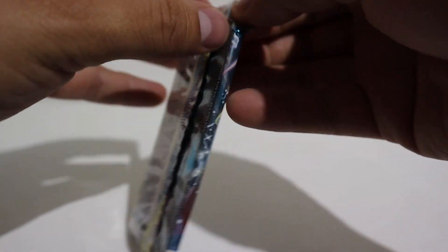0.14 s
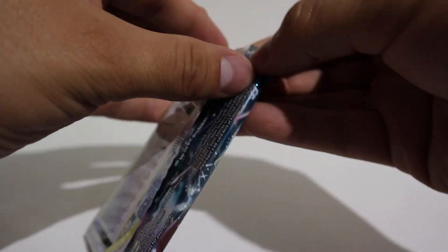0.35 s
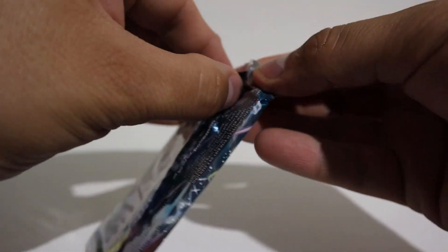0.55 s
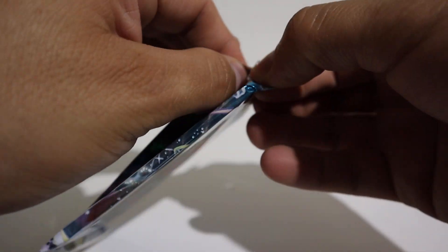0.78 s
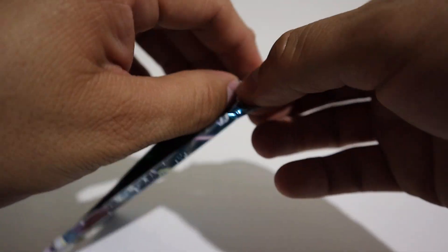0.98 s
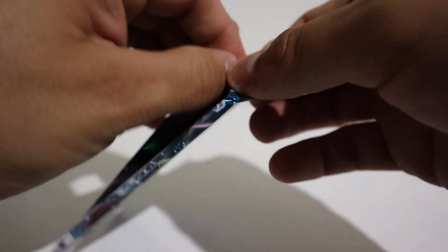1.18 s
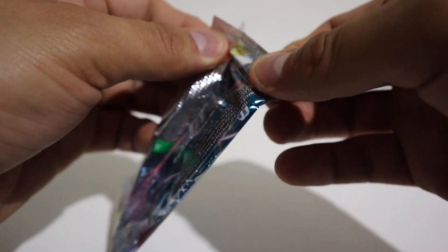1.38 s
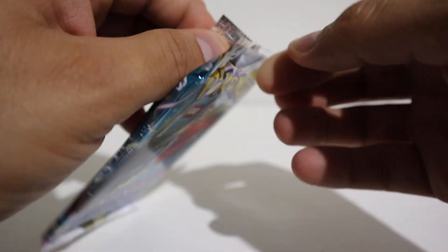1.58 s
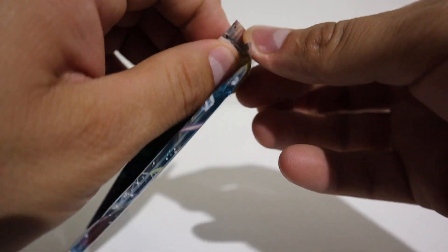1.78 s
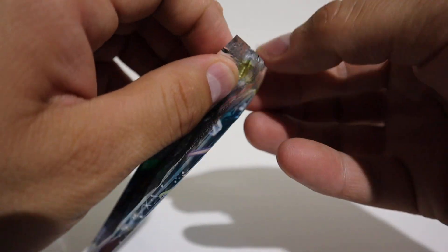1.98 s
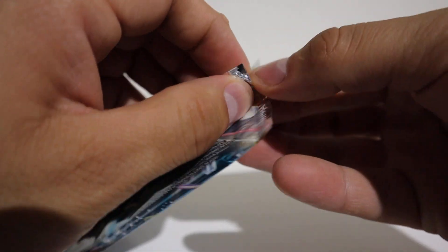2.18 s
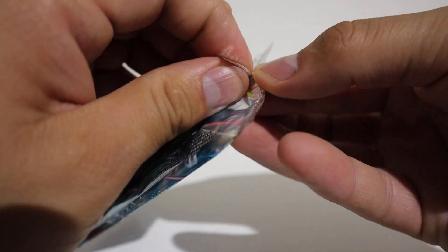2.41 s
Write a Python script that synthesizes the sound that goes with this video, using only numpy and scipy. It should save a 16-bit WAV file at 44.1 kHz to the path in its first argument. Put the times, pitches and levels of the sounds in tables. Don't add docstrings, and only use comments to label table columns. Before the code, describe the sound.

A foil wrapper crinkles and tears in sharp crackling snaps, close up in a quiet room

```python
import sys
import numpy as np
from scipy import signal
from scipy.fft import rfft, irfft
from scipy.io import wavfile

SR = 44100
rng = np.random.default_rng(int(sys.argv[2]) if len(sys.argv) > 2 else 0)


def wav_record(signal):
    frames = np.transpose(np.atleast_2d(signal))
    bounded = np.clip(frames, -1, 1)
    quanta = np.round(bounded * 32767).astype(np.int16)
    wavfile.write(sys.argv[1], SR, quanta)


N = 108045

# (frequency [Hz], level [dB])
FOIL_COLOUR = [(2200, -11), (3800, -7), (5000, -8), (6500, -6.5), (8000, -7.5), (10500, -4), (13000, -10)]
# (frequency [Hz], level [dB])
PACK_COLOUR = [(400, -18), (1250, -1.5), (1700, 0.5), (2100, 1.5), (2600, -1.5)]
# (frequency [Hz], likeness [0-1])
PORT_LIKENESS = [(40, 1), (125, 0.86), (300, 0.16), (5000, 0.033)]
BRIGHT_ALIKE, DULL_ALIKE = 0.95, 0.56
PORT_LAG_S = 0.00003
LEAD = 130


def from_db(db):
    return 10 ** (np.asarray(db) / 20)


def rms_one(x):
    return x / np.sqrt(np.mean(x ** 2) + 1e-20)


def at_hz(points, hz):
    table_hz, value = np.transpose(points)
    return np.interp(np.log(hz + 1), np.log(table_hz), value)


def colour(x, points, edge_db=14):
    hz = np.arange(513) * SR / 1024 + 1
    octaves_below = np.maximum(np.log2(points[0][0] / hz), 0)
    octaves_above = np.maximum(np.log2(hz / points[-1][0]), 0)
    level_db = at_hz(points, hz) - edge_db * (octaves_below + octaves_above)
    cepstrum = irfft(np.log(from_db(level_db)))
    cepstrum[1:512] *= 2
    cepstrum[513:] = 0
    response = irfft(np.exp(rfft(cepstrum)))[None, :600]
    return signal.fftconvolve(x, response, axes=1)[:, :x.shape[1]]


def resonate(x, hz, width_hz):
    r = np.exp(-np.pi * width_hz / SR)
    zeros = [(1 - r * r) / 2, 0, (r * r - 1) / 2]
    poles = [1, -2 * r * np.cos(2 * np.pi * hz / SR), r * r]
    return signal.lfilter(zeros, poles, x)


def pair(shared, own, alike):
    alike = np.clip(alike, 0, 1)
    return np.sqrt(alike) * shared + np.sqrt(1 - alike) * own


def to_ports(x, lag_s, pan_db):
    n = x.shape[1]
    cycles = np.arange(n // 2 + 1) / n
    turn = np.exp(-2j * np.pi * cycles * lag_s * SR)
    left = x[0] * from_db(pan_db / 2)
    right = irfft(rfft(x[1]) * turn, n) * from_db(-pan_db / 2)
    return np.array([left, right])


def add(out, x, s):
    i = int(s * SR) - LEAD
    out[:, i:i + x.shape[1]] += x[:, :N - i]


def hum():
    # (frequency [Hz], level [dB per Hz])
    air_colour = [(34, -7.5), (46, -5), (160, -5), (400, -10), (6000, -22), (12000, -23.5)]
    # (time [s], level [dB])
    gain_ride = [(0, 3), (1.35, 1.5), (1.38, 0.5), (1.7, -0.5), (2.45, -1)]
    fan_hz, overtone_hz, fan_spread_hz = 202, 307, 22
    hz = np.arange(N // 2 + 1) * SR / N
    mid, side = rfft(rng.standard_normal((2, N))) * from_db(at_hz(air_colour, hz))
    alike = np.clip(at_hz(PORT_LIKENESS, hz), 0, 1)
    left_right = np.array([[1], [-1]])
    air = irfft(np.sqrt(1 + alike) * mid + np.sqrt(1 - alike) * side * left_right, N)

    def wavering_tone(tone_hz, width_hz):
        once = resonate(rng.standard_normal(N), tone_hz, width_hz)
        return rms_one(resonate(once, tone_hz, width_hz))

    fan = from_db(-60.5) * wavering_tone(fan_hz, fan_spread_hz)
    overtone = from_db(-64) * wavering_tone(overtone_hz, fan_spread_hz * 2)
    gain = from_db(np.interp(np.arange(N) / SR, *np.transpose(gain_ride)))
    return gain * (from_db(-49) * rms_one(air) + fan + overtone)


def grains(low_hz, high_hz, points, alike):
    grains_per_s, spread_db, cycles, pitches = 9000, 2.7, 12.0, 16
    sizes = from_db(spread_db * np.minimum(rng.exponential(1, N), 5))
    sizes = sizes * (rng.random(N) < grains_per_s / SR)
    sizes = sizes * pair(rng.standard_normal(N), rng.standard_normal((2, N)), alike)
    dealt = rng.integers(0, pitches, N)
    rings = 0
    for k, hz in enumerate(np.geomspace(low_hz, high_hz, pitches)):
        pops = sizes * (dealt == k) + 1e-18
        rings = rings + resonate(pops, hz, hz * 2 / cycles) / np.sqrt(hz)
    if low_hz > 2000:
        rings = np.diff(rings, prepend=0)
    lag_s = PORT_LAG_S * (low_hz > 3000)
    return to_ports(rms_one(colour(rings, points)), lag_s, 0)


def rustle():
    # (time [s], length [s], level [dB], dull part re level [dB])
    strokes = [(0.053, 0.028, -46.5, -10), (0.155, 0.091, -35.5, -12.5), (0.246, 0.094, -40.5, -8.5),
               (0.395, 0.042, -36.5, -5), (0.508, 0.058, -43.5, 0), (0.542, 0.041, -40.5, -1),
               (0.597, 0.14, -44.5, 3), (0.952, 0.036, -41.5, -3), (0.994, 0.058, -36, -5),
               (1.063, 0.055, -45, -0.5), (1.124, 0.071, -35.5, 0), (1.206, 0.054, -35.5, -6),
               (1.299, 0.055, -25.5, -8), (1.469, 0.05, -44.5, -14), (1.565, 0.054, -38.5, -11),
               (1.663, 0.03, -31, -8), (1.879, 0.033, -40.5, -23), (1.928, 0.0068, -37, -15),
               (2.089, 0.066, -46, 3), (2.189, 0.033, -41.5, 1.5), (2.24, 0.08, -46.5, -1),
               (2.346, 0.049, -48, -8), (2.417, 0.0096, -56, -64)]
    attack_s, release_s = 0.012, 0.009
    tilt = 0.25
    t, top, middle, dull = np.arange(N) / SR, 0, 0, 0
    for s, length, db, dull_db in strokes:
        swell = np.clip((t - s) / attack_s, 0, 1) ** 2
        shape = swell * np.exp(-np.maximum(t - s - length, 0) / release_s)
        top = top + shape * from_db(db - tilt * dull_db)
        middle = middle + shape * from_db(db)
        dull = dull + shape * from_db(db + dull_db)
    return (top * grains(4300, 11400, FOIL_COLOUR, BRIGHT_ALIKE)
            + middle * grains(2590, 4630, FOIL_COLOUR, DULL_ALIKE)
            + dull * grains(480, 2960, PACK_COLOUR, DULL_ALIKE))


def snap(bright_db, dull_db, hz, noise, chance):
    crack_s = 0.0008 * from_db(3 * np.clip(chance[0], -1.5, 1.5))
    rattle_s, rattle_db, thump_s = 0.003, -16, 0.0007
    lead_in_s, lead_in_db = 0.0008, -17
    early = (np.arange(noise.shape[1]) - LEAD) / SR
    t = np.maximum(early, 0)
    crack = (t > 0) * (np.exp(-t / crack_s) + from_db(rattle_db) * np.exp(-t / rattle_s))
    crack = crack + (early <= 0) * from_db(lead_in_db) * np.exp(np.minimum(early, 0) / lead_in_s)
    click = -from_db(15 + 2 * chance[3]) * (np.arange(len(t)) == LEAD + 4)
    thump = t / thump_s * np.exp(-t / thump_s)
    bright = colour(pair(noise[0], noise[1:3], BRIGHT_ALIKE) * crack + click, FOIL_COLOUR)
    dull = colour(pair(noise[3], noise[4:], DULL_ALIKE) * thump + 0.2 * click, PACK_COLOUR)

    if hz > 2300:
        bright = signal.lfilter(*signal.butter(1, min(1.8 * hz, 19000), fs=SR), bright)
        bright = bright + from_db(13.0) * resonate(bright, hz, hz * 0.4)
    else:
        dull = dull + 2 * resonate(dull, hz, hz / 2)

    def onset_level(x):
        return np.sqrt(np.mean(x[:, LEAD - 10:LEAD + 90] ** 2)) + 1e-9

    lag_s, pan_db = PORT_LAG_S + 0.00004 * chance[1], 2.0 * chance[2]
    bright = to_ports(bright / onset_level(bright), lag_s, pan_db)
    return from_db(bright_db) * bright + from_db(dull_db) * dull / onset_level(dull)


def snaps():
    # (time [s], bright level [dB], dull level [dB], crease pitch [Hz])
    bends = [(0.1326, -21, -33.5, 3600), (0.2062, -24, -60, 6370), (0.2141, -16.5, -30.5, 10200),
             (0.2329, -30, -38, 9260), (0.265, -40, -52, 10490), (0.2822, -26, -29, 3980),
             (0.2966, -34, -36, 6420), (0.3032, -29.5, -46.9, 4890), (0.319, -31.8, -51, 4910),
             (0.3358, -23, -26, 3640), (0.3531, -33, -28, 3080), (0.3575, -25.5, -34, 6360),
             (0.4, -28, -51, 5700), (0.4056, -12, -14, 1260), (0.446, -25.5, -33.6, 1760),
             (0.476, -33, -38.0, 1790), (0.4977, -15, -20, 1520), (0.503, -39.2, -23.5, 1770),
             (0.5187, -11.5, -27, 8500), (0.5316, -30.1, -50, 10530), (0.5689, -22, -45.2, 11150),
             (0.5736, -24, -40, 1720), (0.5745, -24.5, -43, 1960), (0.5834, -27.5, -45, 3730),
             (0.59, -28, -49, 9200), (0.6019, -32, -58, 4820), (0.6071, -30, -40, 10200),
             (0.611, -31.5, -42, 4950), (0.6151, -23.5, -27.5, 1850), (0.6369, -29, -15.5, 1720),
             (0.6551, -8.5, -33, 11200), (0.6598, -19.5, -34.5, 4030), (0.675, -43, -35, 3880),
             (0.684, -13, -20, 5830), (0.693, -26, -40, 3020), (0.7106, -29.5, -47, 3320),
             (0.7312, -17.5, -26.5, 1930), (0.7758, -23.5, -31.5, 11500),
             (0.7794, -20.5, -48.2, 3730), (0.8301, -36.5, -61, 8530), (0.8436, -40, -63, 9150),
             (0.8534, -44, -66, 9300), (0.8684, -43, -72, 9400),
             (0.9396, -26.5, -41, 3080), (0.9976, -19.5, -52, 5800), (1.008, -13, -43, 9500),
                  (1.017, -40, -49, 5860), (1.032, -19.5, -29, 5700), (1.0432, -25, -37, 4580),
                  (1.0938, -30, -56.6, 3150), (1.1017, -32, -43, 8400), (1.104, -28, -54, 3700),
                  (1.1171, -28, -34, 1960), (1.1305, -13.5, -30, 7500), (1.1327, -11, -29.5, 11000),
                  (1.1477, -20, -40, 8300), (1.1677, -3, -14, 7820), (1.2194, -15.6, -52, 10300),
                  (1.2322, -18, -24.5, 9500), (1.2352, -17, -38, 4700), (1.278, -33, -45, 7750),
                  (1.2935, -20, -41.5, 9780), (1.301, -14.5, -45.2, 10660), (1.3036, -17.0, -34, 3330),
                  (1.3137, -10, -47, 10500), (1.3171, -6.5, -44, 10000), (1.3244, -26, -27.5, 9800),
                  (1.3355, -11, -30.8, 7700), (1.3403, -12, -16, 4070), (1.352, -4.5, -19, 3820),
                  (1.3771, -11.5, -26, 7900), (1.4755, -34, -56, 4590), (1.4909, -29.5, -52, 3200),
                  (1.4983, -25, -48.4, 9500),
             (1.5079, -32, -56.8, 9910), (1.5199, -40, -42.7, 2660), (1.5904, -10, -28, 5900),
                  (1.5988, -23.4, -29.5, 5470), (1.614, -28.8, -43, 3360), (1.6401, -21.5, -25.5, 2780),
                  (1.675, -27, -30.5, 8100), (1.7001, -27, -36, 10400), (1.808, -31.8, -38.5, 11070),
                  (1.8231, -15, -24.5, 9900), (1.8303, -14, -33, 10200), (1.836, -17, -23, 4400),
                  (1.8423, -12, -23.5, 4360), (1.8928, -26.5, -61.0, 5330), (1.912, -32, -55.6, 6010),
                  (1.916, -30, -49, 6290), (1.9219, -27.5, -45, 6160), (1.9534, -23, -35, 5000),
                  (1.957, -9.5, -26.5, 9200), (1.9682, -14.5, -39, 5920), (1.9747, -42, -58, 6650),
                  (2.0211, -33, -35.5, 1830), (2.0659, -48, -45, 2070), (2.0837, -29.5, -33.5, 4400),
                  (2.1034, -31, -57.8, 9700), (2.1147, -39, -46, 2050), (2.1448, -36.5, -34, 2130),
                  (2.1844, -44, -49.0, 2820), (2.2399, -15, -24.5, 5840), (2.2443, -12.7, -22, 6300),
                  (2.319, -34, -48.2, 10300), (2.3498, -31.1, -41, 8750), (2.3643, -30.5, -39, 10100),
                  (2.3699, -28, -47, 11280),
             (1.3461, -13, -31, 9700),
        (1.3503, -15, -24, 10900),
    ]
    rows = bends
    out = np.zeros((2, N))
    noise = rng.standard_normal((len(rows), 6, 1024))
    chance = rng.standard_normal((len(rows), 4))
    for (s, bright_db, dull_db, hz), v, c in zip(rows, noise, chance):
        add(out, snap(bright_db, dull_db, hz, v, c), s)
    return out


def knocks():
    # (time [s], level [dB])
    contacts = [(0.28, -42.5), (0.336, -38), (0.555, -39), (1.129, -36), (1.168, -32.5), (1.341, -31.5),
                (1.64, -34), (1.671, -37.5), (1.70, -42), (1.823, -34), (1.842, -38), (2.084, -40),
                (2.244, -33.5), (2.35, -42)]
    table_hz, width_hz = 282, 353
    push = np.zeros(N)
    for s, db in contacts:
        push[int(s * SR)] = -from_db(db + 40.0)
    thud = resonate(push + 1e-18, table_hz, width_hz)
    return resonate(thud, table_hz * 2, width_hz * 2)


def creak():
    # (time [s], rate [slips per s], level [dB])
    slip_path = [
        (1.5415, 160, -36),
        (1.548, 175, -24),
        (1.562, 250, -25),
        (1.571, 400, -24),
        (1.577, 650, -22),
        (1.5888, 400, -22),
    ]
    # (frequency [Hz], level [dB])
    tick_colour = [(2200, -7.5), (3600, -1.5), (5000, -9.5), (8500, 0), (12500, -0.5)]
    rebound_s, fizz_s = 0.0016, 0.0004
    out, (s, rate, db) = np.zeros((2, N)), np.transpose(slip_path)
    t = np.arange(s[0], s[-1], 1 / SR)
    slip_count = np.floor(np.cumsum(np.interp(t, s, rate)) / SR - .01)
    slips = t[np.flatnonzero(np.diff(slip_count))]
    noise, chance = rng.standard_normal((40, 2, 512)), rng.standard_normal(40)
    n = np.arange(512) - LEAD
    for at, v, c in zip(slips, noise, chance):
        fizz = .2 * v * (n > 0) * np.exp(-np.abs(n) / SR / fizz_s)
        rebound = .4 * (n == int(rebound_s * SR))
        x = colour(fizz - (n == 0) + rebound, tick_colour)
        level = from_db(np.interp(at, s, db) + 17.5 + c)
        add(out, to_ports(x / np.abs(x).max() * level, PORT_LAG_S, 0), at)
    return out


def room(x):
    # (frequency [Hz], time to fall 60 dB [s])
    decay = [(500, 0.21), (1500, 0.39), (4000, 0.23), (10000, 0.11)]
    level_db, gap_s = -12.5, 0.00063
    t, tail = np.arange(SR // 2) / SR, 0
    edges = 300 * 2 ** np.arange(0, 6, .7)
    for low, high in zip(edges, edges[1:]):
        noise = rng.standard_normal((3, len(t)))
        noise = pair(noise[0], noise[1:], at_hz(PORT_LIKENESS, low))
        band = signal.sosfilt(signal.butter(2, [low, high], "band", fs=SR, output="sos"), noise)
        t60_s = np.maximum(at_hz(decay, np.sqrt(low * high)), .02)
        tail = tail + band * from_db(-60 * t / t60_s)
    tail = tail * np.clip(t / gap_s, 0, 1) ** 2
    tail = tail / np.sqrt(np.sum(tail ** 2) / 2)
    return from_db(level_db) * signal.fftconvolve(x, tail, axes=1)[:, :N]


def scene():
    foil = rustle() + snaps() + knocks() + creak()
    pan_start_db, settle_s = 3.5, 0.33
    pan_db = pan_start_db * np.exp(-np.arange(N) / SR / settle_s) / 2
    foil = foil * from_db([pan_db, -pan_db])
    return foil + room(foil) + hum()


def top_cut(x):
    return signal.sosfilt(signal.butter(12, 16330, fs=SR, output="sos"), x)


def record(dry):
    x = signal.sosfilt(signal.butter(4, 12500, fs=SR, output="sos"), dry)
    over = x - np.clip(x, -.95, .95)
    shaved = signal.sosfilt(signal.butter(2, 500, "high", fs=SR, output="sos"), over)
    return top_cut(np.clip(x - shaved, -1, 1))


dry = scene()
out = record(dry)
wav_record(out)
```